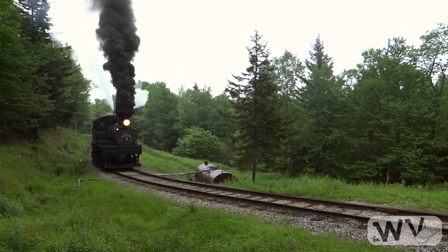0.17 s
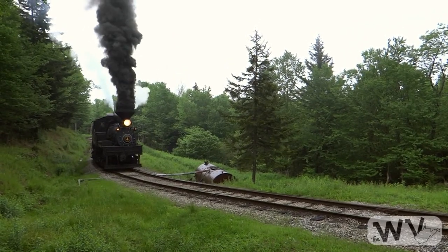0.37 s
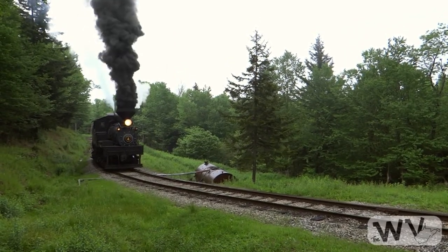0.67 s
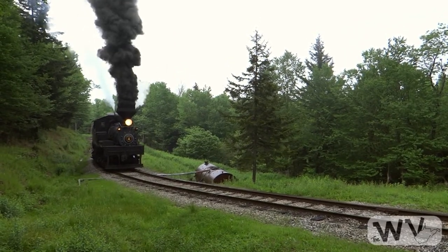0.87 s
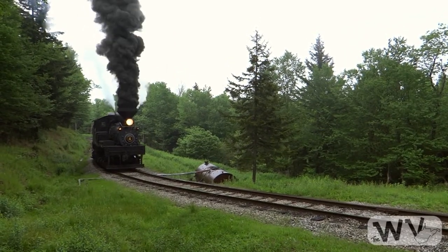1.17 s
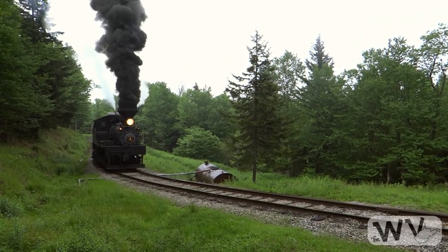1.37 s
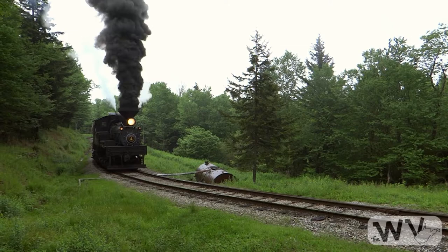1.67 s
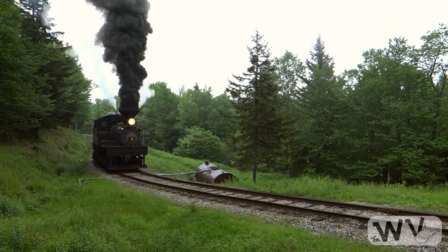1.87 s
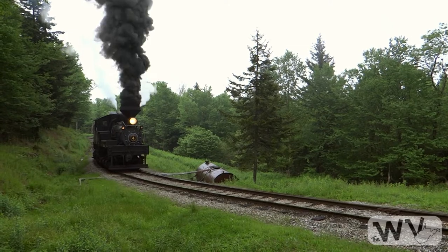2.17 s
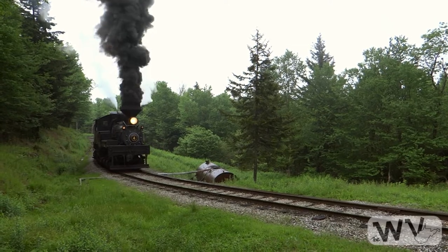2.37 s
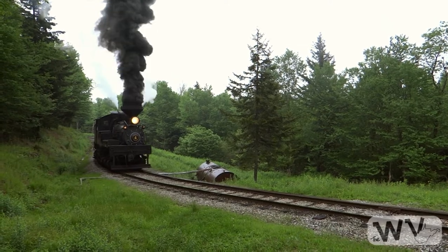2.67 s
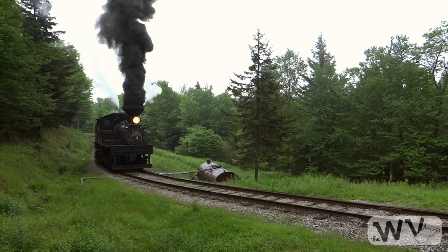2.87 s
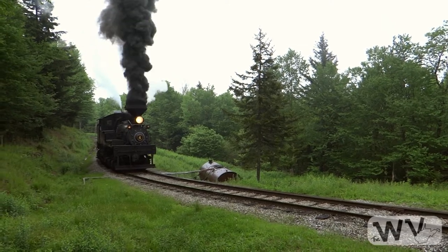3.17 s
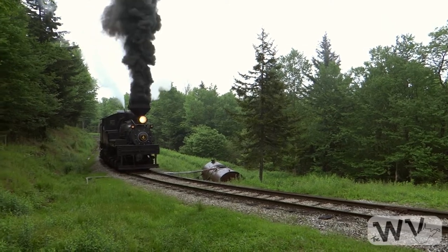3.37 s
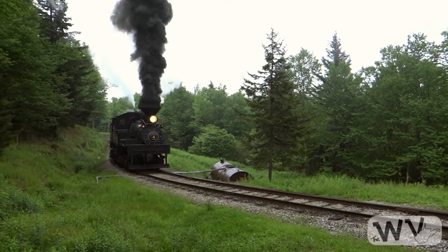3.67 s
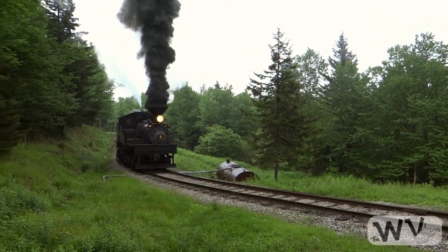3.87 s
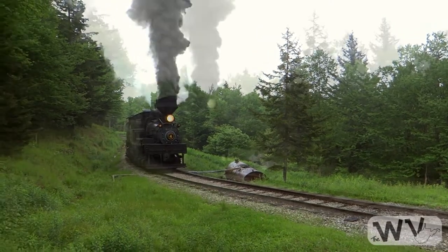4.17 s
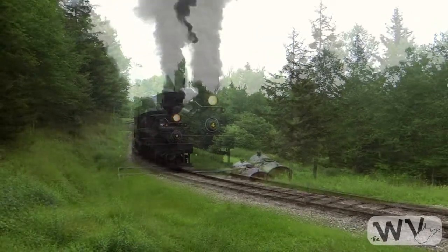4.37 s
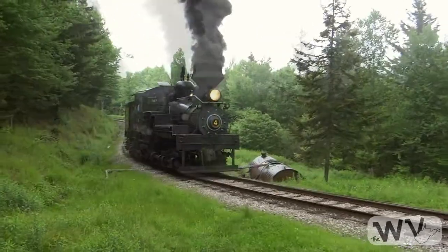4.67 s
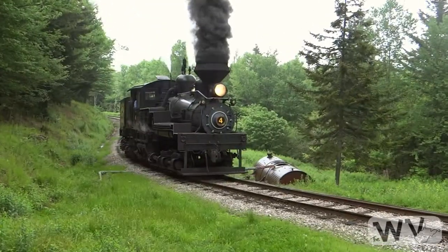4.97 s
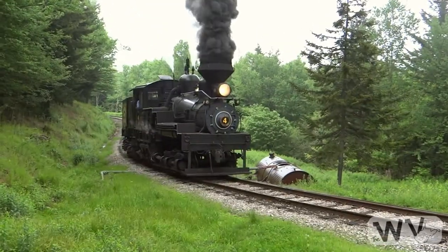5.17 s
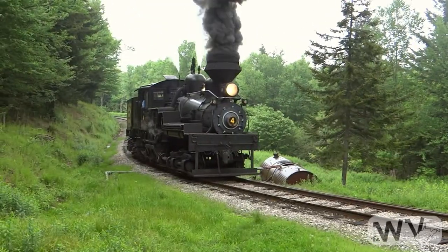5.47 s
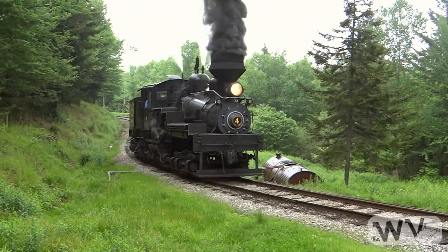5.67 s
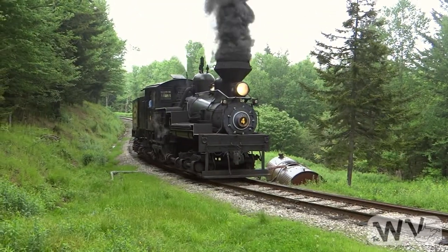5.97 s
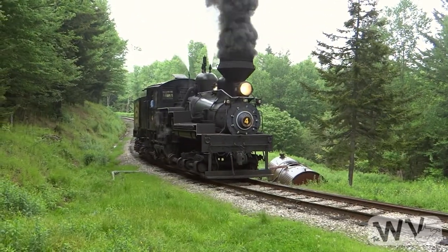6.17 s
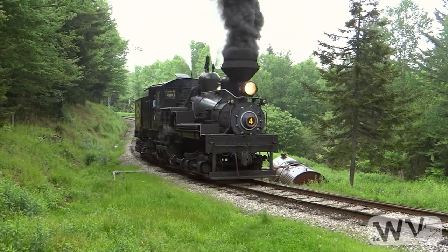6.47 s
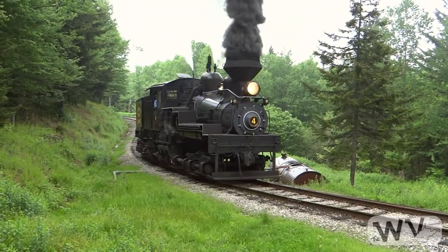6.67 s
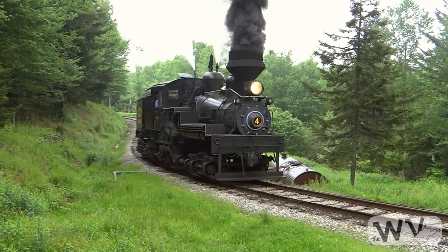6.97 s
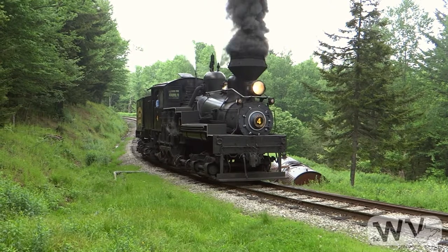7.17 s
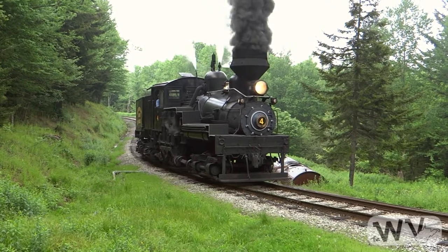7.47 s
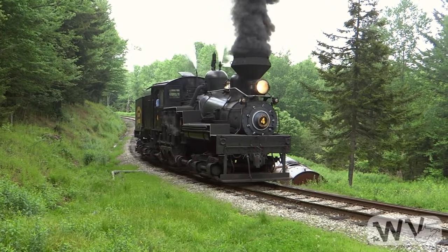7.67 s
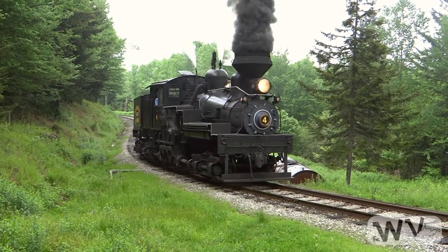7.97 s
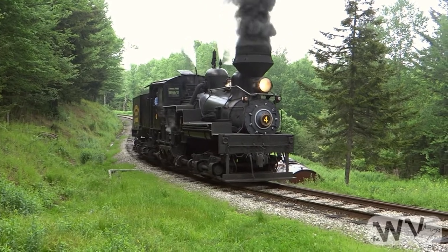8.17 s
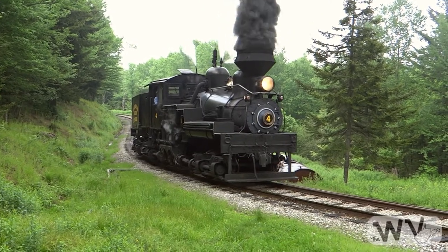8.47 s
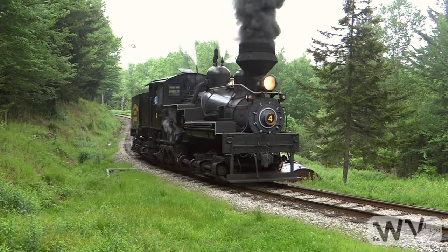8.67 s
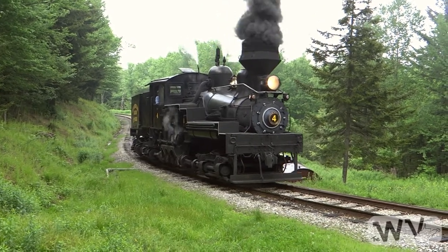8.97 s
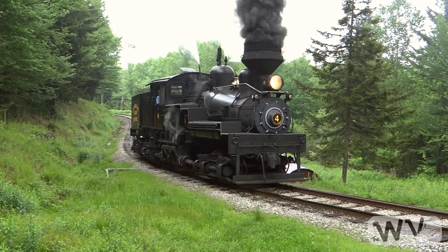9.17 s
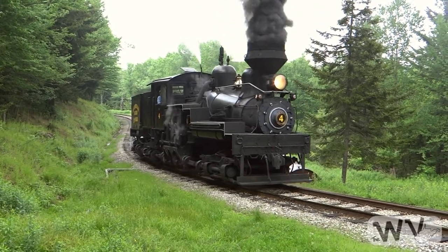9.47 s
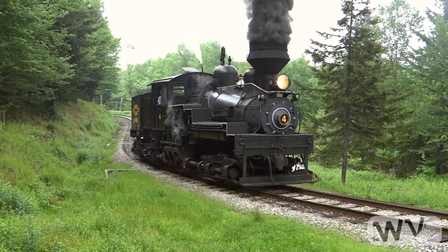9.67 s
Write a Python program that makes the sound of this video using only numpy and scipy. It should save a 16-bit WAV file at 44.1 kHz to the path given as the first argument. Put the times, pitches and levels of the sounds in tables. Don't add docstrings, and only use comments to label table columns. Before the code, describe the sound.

From 0 s a broad, bright steam hiss runs steadily, a little left of centre, over a soft combustion roar and low uneven rumble. Beneath it come muffled, hollow chuffs, about four a second, ragged in strength, each with a low chimney ring and light thump; stronger ones fall near 1.3 and 3.0 s. From about 3 s the hiss weakens, reaching its quietest near 4.5 s as the distant perspective blends into a closer one. It climbs again from 5 s and is full by 7 s, crisper and more fluttering, with small spurts and swells. Chuffs continue slightly slower and lower in ring, with harder puffs near 6.3, 7.2 and 8.9 s. A needle-thin, sputtering, very high leak whistle strengthens after 7 s. Open-air trackside microphone, short echoes off the bank when close; the steam is still going at 9.8 s.

```python
import sys
import numpy as np
from scipy import signal
from scipy.io import wavfile
from scipy.ndimage import uniform_filter1d

SR = 44100
rng = np.random.default_rng(int(sys.argv[2]) if len(sys.argv) > 2 else 0)


def wav_record(signal):
    frames = np.transpose(np.atleast_2d(signal))
    bounded = np.clip(frames, -1, 1)
    quanta = np.round(bounded * 32767).astype(np.int16)
    wavfile.write(sys.argv[1], SR, quanta)


def decibels_to_gain(level_db):
    exponent = np.asarray(level_db, float) / 20
    return 10 ** exponent


N = 433062
HOP, FRAME = 256, 1024
HZ = np.fft.rfftfreq(FRAME, 1 / SR)
TIMES = np.arange(N // HOP + 5) * HOP / SR
NOW = np.arange(N) / SR


def evened(x):
    return x / np.sqrt(np.mean(x ** 2) + 1e-20)


def read(points, hz):
    f, value = np.transpose(points)
    return np.interp(np.log(hz + 1), np.log(f + 1), value)


def curve(rows, t):
    s, value = np.transpose(rows)
    return np.interp(t, s, value)


def bumps(rows):
    s, db, length = np.transpose(rows)[:, :, None]
    return (db * np.exp(-((TIMES - s) / length) ** 2)).sum(axis=0)


def above(hz, width):
    return 1 / (1 + np.exp(np.clip((hz - HZ[:, None]) / width, -50, 50)))


# (t/s, share of the closer view/0-1)
CLOSENESS = [(0, 0.08), (3.6, 0.25), (4.4, 0.5), (5, .95), (5.6, 0.94), (9.82, 0.9)]


def closeness(t):
    return np.clip(curve(CLOSENESS, t), 0, 1)


def blend(far, near, per_s, t):
    close = closeness(t)
    return (1 - close) * far + close * (near + per_s * (t - 7.7))


def colour(far, near):
    close = closeness(TIMES)
    a, b = (evened(decibels_to_gain(read(spectrum, HZ)))[:, None] for spectrum in (far, near))
    return np.sqrt((1 - close) * a ** 2 + close * b ** 2)


# (f/Hz, correlation/0-1)
LIKENESS_FAR = [(60, 0.93), (180, 0.94), (550, 0.87), (1650, 0.95), (4970, 0.96), (15000, 0.96)]
LIKENESS_NEAR = [(60, 0.94), (180, 1), (550, 0.9), (1650, 1), (4970, 0.96), (15000, 0.99)]


def noise(gain):
    a, b, c, d = rng.standard_normal((len(TIMES), len(HZ), 4)).T
    close = closeness(TIMES)
    same = np.outer(read(LIKENESS_FAR, HZ), 1 - close) + np.outer(read(LIKENESS_NEAR, HZ), close)
    same = np.clip(same, 0, 1)
    mid = np.sqrt((1 + same) / 2) * (a + 1j * b)
    side = np.sqrt((1 - same) / 2) * (c + 1j * d)
    spectrum = np.array([mid + side, mid - side]) * gain / np.sqrt(1.5 * FRAME)
    return signal.istft(spectrum, nperseg=FRAME, noverlap=FRAME - HOP)[1][:, :N]


def patches(bins, frames):
    z = rng.standard_normal((len(TIMES), len(HZ))).T
    return evened(uniform_filter1d(uniform_filter1d(z, bins, 0), frames, 1))


def flutter(rate_hz):
    return evened(signal.lfilter(*signal.butter(N=2, Wn=rate_hz, fs=SR), rng.standard_normal(N)))


def resonate(x, hz, width, order=2):
    turn = np.exp(2j * np.pi * np.cumsum(hz * np.ones(N)) / SR)
    r = np.exp(-np.pi * width / SR)
    low = x / turn
    for _ in range(order):
        low = signal.lfilter([1 - r], [1, -r], low)
    return 2 * (turn * low).real


# (delay/ms, amplitude share)
REFLECTIONS = [(1.701, 0.09), (1.791, 0.07), (1.882, 0.05), (2.063, 0.05), (2.018, 0.04)]


def bank(x):
    late = 0
    for delay_ms, share in REFLECTIONS:
        delay = round(delay_ms * SR / 1000)
        late = late + share * np.pad(x, ((0, 0), (delay, 0)))[:, :N]
    return x + closeness(NOW) * late


# (t/s, level/dB)
WHISTLE_LEVEL = [(0.0, -39), (0.44, -40), (2.16, -36.5), (3.36, -38), (4.32, -45), (4.89, -43),
                 (5.06, -36.5), (7.3, -27.5), (7.6, -32), (7.82, -24), (7.9, -29), (8.34, -27.5),
                 (8.48, -20), (8.5, -28), (9.52, -24.5), (9.57, -29), (9.82, -19)]
# (f/Hz, width/Hz, level/dB)
WHISTLE_LINES = [(13833, 38, 0), (13935, 55, -1)]


def leak():
    close = closeness(NOW)
    sharp = 0.03 + 0.45 * close
    air = rng.standard_normal((3, N))
    lines = 0
    for a, (hz, width, db) in zip(air, WHISTLE_LINES):
        lines = lines + decibels_to_gain(db) * evened(resonate(a, hz, width))
    core = evened(resonate(air[2], 13950, 340))
    skirt = evened(resonate(air[2], 13950, 340, order=1))
    band = evened(core + 0.4 * skirt)
    whistle = np.sqrt(sharp) * evened(lines) + np.sqrt(1 - sharp) * band
    sputter = decibels_to_gain(0.9 * flutter(13) + 0.67 * flutter(70))
    return decibels_to_gain(curve(WHISTLE_LEVEL, NOW) - 0.3 + 1.4 * close) * sputter * whistle


# (t/s, level/dB)
STEAM_LEVEL = [(0, -20.5), (2.1, -21), (3, -24.5), (3.8, -29), (4.43, -34), (4.9, -31.5), (5.2, -27.5),
               (5.94, -23.5), (6.6, -21), (7.0, -19.5), (7.6, -19.5), (8.5, -19), (9.3, -20), (9.6, -19.5),
               (9.82, -19)]


def steam_level():
    return curve(STEAM_LEVEL, TIMES)


# (f/Hz, level/dB)
RUMBLE_SPECTRUM_FAR = [(30, -14), (90, -2), (140, -9.5), (250, 0.5), (330, 2), (400, -17), (500, -29)]
RUMBLE_SPECTRUM_NEAR = [(30, -17), (100, -11), (230, 4.5), (350, -4), (500, -35)]
# (t/s, extra level/dB, length/s)
DRAUGHT_SURGES = [(.72, 4, .1), (1.45, 6, 0.15), (1.72, 6, .1), (2.32, 7, .08), (2.85, 1, .2), (3.4, 5, .1),
                  (4.0, 5, .1), (5.28, 4, .08), (6.25, 7, .1), (6.78, 9, .08), (7.62, 3, .1), (8.5, 5, .09),
                  (9.1, 2, .1), (9.33, 3, .08)]


def rumble():
    level_db = 0.86 * steam_level() + blend(-27.5, -31, -0.1, TIMES) + bumps(DRAUGHT_SURGES)
    return decibels_to_gain(level_db) * colour(RUMBLE_SPECTRUM_FAR, RUMBLE_SPECTRUM_NEAR)


# (f/Hz, level/dB)
ROAR_SPECTRUM_FAR = [(330, -27), (420, -8.5), (600, -1.5), (900, 1), (1200, 3.5), (1600, 0), (2200, -40)]
ROAR_SPECTRUM_NEAR = [(300, -28), (400, -9), (560, -2), (710, 2), (810, -3.5), (950, 0.5), (1200, -1.5),
                      (1450, 0), (2200, -26)]
# (t/s, f/Hz)
PIPE_RESONANCE = [(5, 1140), (6.5, 1190), (7.5, 1070), (8.5, 1060), (9.2, 970), (9.82, 1000)]
# (t/s, extra level/dB, length/s)
FIRE_SWELLS = [
    (1.35, 3, 0.11),
    (3.5, 2.5, .07),
    (4.12, 1.5, .12),
    (5.5, 1, .3),
    (6.4, 3, 0.31),
    (7.0, 2, 0.19),
    (7.85, -2.5, .08),
    (8.9, 2, 0.089),
    (9.25, 4, 0.12),
]


def roar():
    waver_db = 0.42 * np.interp(TIMES, NOW, flutter(11))
    level_db = steam_level() + blend(-12, -14, 0, TIMES) + waver_db + bumps(FIRE_SWELLS)
    offset_hz = HZ[:, None] - curve(PIPE_RESONANCE, TIMES)
    pipe_db = 2.4 * closeness(TIMES) * np.exp(-(offset_hz / 70) ** 2)
    return decibels_to_gain(level_db + pipe_db) * colour(ROAR_SPECTRUM_FAR, ROAR_SPECTRUM_NEAR)


# (f/Hz, level/dB)
HISS_SPECTRUM_FAR = [(900, -32), (1700, -10.5), (2400, -7.5), (4000, -6.0), (5600, -3.5), (7600, 0.0),
                     (9200, 0.0), (10300, -4.5), (11200, -10.0), (12200, -16.5), (13300, -17.0),
                     (14600, -15.5), (15200, -19.0), (15750, -21.0)]
HISS_SPECTRUM_NEAR = [(900, -34), (1450, -17), (1650, -9.5), (2400, -8.5), (4000, -5), (5600, -4.5),
                      (7600, -1), (9200, 0), (10300, -2), (11200, -6), (12200, -10), (13300, -9.5),
                      (14600, -10.5), (15750, -16.5)]
# (t/s, spread/dB, length/s)
JET_SWINGS = [(1.6, 1, .3), (3.5, 2.5, .08), (4.62, -2.5, 0.092), (6.45, 0.5, 0.14), (8.05, -0.5, .12),
              (8.45, -0.5, 0.062), (8.6, 1, .05), (8.72, -1, 0.036), (8.85, 1.5, 0.075), (9.0, -2, .07),
              (9.19, 3, .08), (9.35, 0, .04), (9.45, 2.5, 0.084), (9.75, -3.5, 0.13)]
# (t/s, extra fizz level/dB, length/s)
FIZZ_SPURTS = [(5.9, 2, .25), (6.6, -2.5, .15), (6.79, 2, .04), (7.4, 3.5, .2), (7.66, -1.5, .06),
               (8.4, 2, .1), (8.6, 3, .06), (8.72, -4, .05), (9.05, 2, .1), (9.36, -3, .08),
               (9.62, 1.5, .12), (9.8, 2, .05)]


def jet():
    swing_db = bumps(JET_SWINGS)
    core_db = steam_level() - 0.3 * swing_db
    body_db = blend(-0.67, 0.1, -0.11, TIMES) + 0.9 * swing_db
    fizz_db = blend(-2, -1.5, 1, TIMES) + bumps(FIZZ_SPURTS) + 0.3 * swing_db
    tilt_db = above(11250, 330) * fizz_db + (1 - above(6400, 610)) * body_db
    return decibels_to_gain(core_db + tilt_db + 8) * colour(HISS_SPECTRUM_FAR, HISS_SPECTRUM_NEAR)


def gusts():
    top, low = above(11250, 330), 1 - above(430, 60)
    gusts_db = 0.66 * patches(bins=12, frames=6)
    gusts_db = gusts_db + 0.55 * (1 - above(5000, 900)) * patches(bins=160, frames=5)
    gusts_db = gusts_db + 0.5 * top * patches(bins=110, frames=8)
    gusts_db = gusts_db + 1.5 * low * patches(bins=8, frames=20)
    return gusts_db + 0.43 * closeness(TIMES) * (1 - low) * patches(bins=35, frames=26)


def steam():
    power = jet() ** 2 + roar() ** 2 + rumble() ** 2
    lean_db = 1.14 * blend(2.5, 0.5, -0.12, TIMES) * above(900, 400) * (1 - 0.5 * above(11250, 330))
    sides_db = np.array([lean_db, -lean_db]) / 2
    return noise(np.sqrt(power) * decibels_to_gain(gusts() + sides_db)) * decibels_to_gain(0.51 * flutter(45))


# (f/Hz, level/dB)
BLAST_SPECTRUM_FAR = [(30, -26), (90, -6.5), (135, -28), (180, 2), (260, -1), (345, -1.5), (410, -19),
                      (600, -7), (1000, -27), (2500, -42)]
BLAST_SPECTRUM_NEAR = [(30, -42), (100, -24), (170, -3.5), (250, -1), (320, -16), (450, -8), (700, -17),
                       (2000, -31)]
# (f/Hz, level/dB)
SPRAY_SPECTRUM = [(300, -26), (480, 1), (700, 3), (1100, 0), (3000, -1), (6000, -25)]
# (peak t/s, level/dB, length/ms,
# thump level/dB)
EXHAUST_BEATS = [(.027, -43, 77, -14), (.253, -42, 73, -9), (.54, -45.5, 70, -3), (.67, -55, 200, -11),
                 (.796, -41.5, 100, -7), (1.12, -37, 74, -6), (1.329, -34, 85, -15), (1.48, -44, 128, -12),
                 (1.612, -37.5, 92, -21), (1.867, -43, 92, -6), (2.17, -42, 81, -7), (2.34, -55, 168, -14.5),
                 (2.436, -43.5, 110, -2.5), (2.776, -40, 72, -7), (2.992, -36.5, 67, -7),
                 (3.302, -46.5, 60, -6), (3.539, -46.5, 70, -22), (3.843, -49, 82, -14), (4.09, -52.5, 190, -8),
                 (4.403, -51.5, 89, -8), (4.648, -53, 120, -14),
                 (4.877, -49, 93, -19), (5.125, -50, 140, -9), (5.346, -47.5, 104, -13), (5.634, -44, 93, -12),
              (5.824, -43, 88, -16), (6.13, -44, 170, -13), (6.338, -37.5, 101, -17),
              (6.616, -40.5, 87, -9), (6.879, -42, 109, -10), (7.222, -37.5, 59, -12),
              (7.461, -39.5, 56, -12), (7.778, -44, 67, -11), (8.021, -40.5, 97, -10),
              (8.333, -44.5, 85, -22), (8.61, -39.5, 105, -12), (8.937, -34, 58, -23),
              (9.178, -38, 84, -17), (9.425, -40.5, 80, -11), (9.671, -42, 87, -15)]


def chimney():
    t = np.arange(0, N / SR + 0.01, 0.002)
    s, db, length_ms, thump_db = np.transpose(EXHAUST_BEATS)[:, :, None]
    rise_ms, fall_ms = 0.48 * length_ms, 0.52 * length_ms
    u = 1000 * np.where(t < s, (s - t) / rise_ms, (t - s) / fall_ms)
    shape = np.exp(-1.5 * u ** 2) + 0.035 * np.exp(-1.1 * u)

    def envelope(level_db):
        return np.interp(NOW, t, np.sqrt((decibels_to_gain(level_db) ** 2 * shape).sum(axis=0)))

    puff, push = envelope(db), envelope(db + thump_db)
    rush = envelope(1.5 * (db + 37.5) - 38)
    blast = noise(colour(BLAST_SPECTRUM_FAR, BLAST_SPECTRUM_NEAR))
    spray = noise(colour(SPRAY_SPECTRUM, SPRAY_SPECTRUM))
    thump = evened(resonate(rng.standard_normal(N), 86, 59))

    ring_hz = blend(253.4, 217, -9.5, s) * (1 + 0.045 * rng.standard_normal(s.shape))
    ring = resonate(rng.standard_normal(N), np.interp(NOW, s[:, 0], ring_hz[:, 0]), 55)
    ring = evened(ring / uniform_filter1d(abs(ring), size=700) ** 0.7)
    ring = ring * decibels_to_gain(0.5 - 3 * closeness(NOW))

    beats = puff * (decibels_to_gain(5) * blast + ring) + push * decibels_to_gain(-2.5) * thump + rush * spray
    return decibels_to_gain(0.4 * flutter(16)) * beats


def scene():
    return bank(steam() + chimney()) + leak()


def top_cut(x):
    return signal.sosfilt(signal.butter(12, 15950, fs=SR, output="sos"), x)


def record(dry):
    dry = signal.lfilter(*signal.butter(N=1, Wn=55, btype="high", fs=SR), dry)
    knee = 0.68
    limited = knee * np.tanh(dry / knee)
    taps = signal.firwin(2047, 15730, window=("kaiser", 9), fs=SR)
    return top_cut(signal.oaconvolve(limited, taps[None], "same"))


dry = scene()
out = record(dry)
wav_record(out)
```